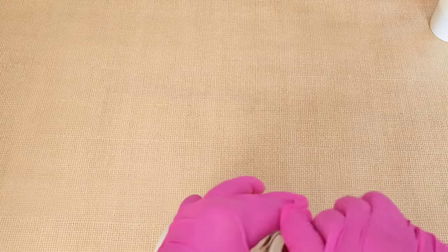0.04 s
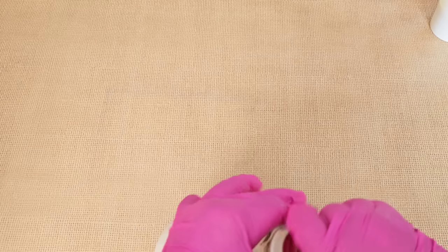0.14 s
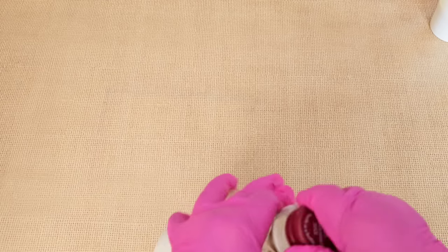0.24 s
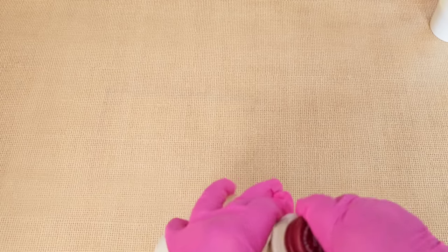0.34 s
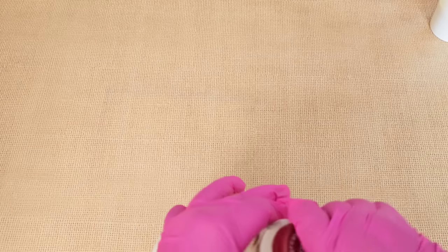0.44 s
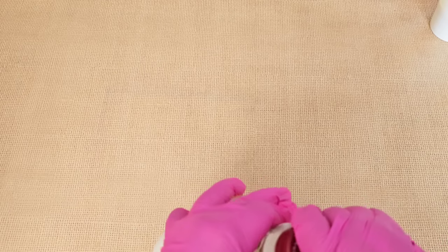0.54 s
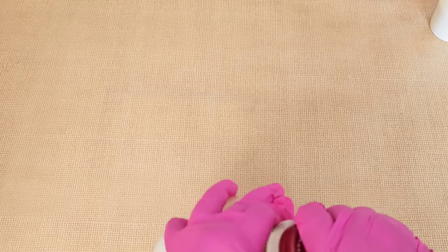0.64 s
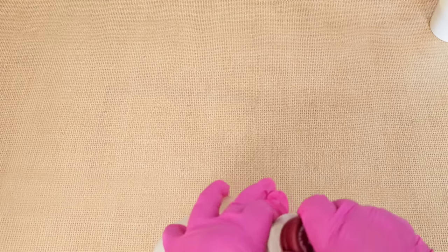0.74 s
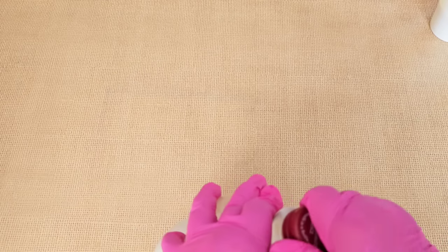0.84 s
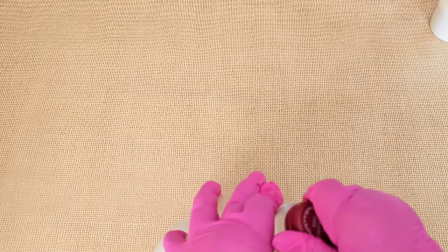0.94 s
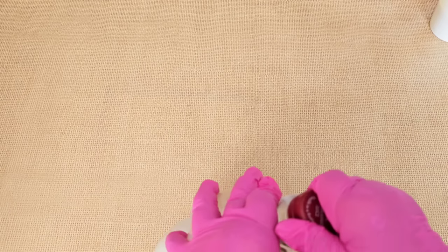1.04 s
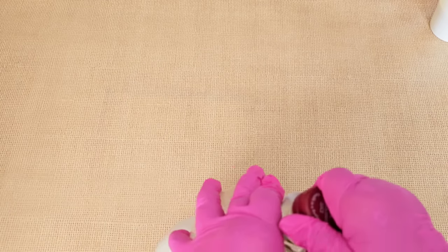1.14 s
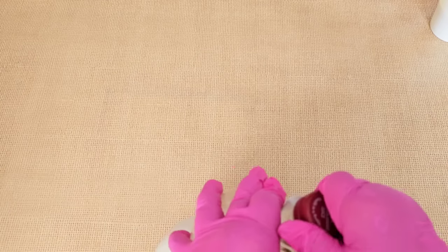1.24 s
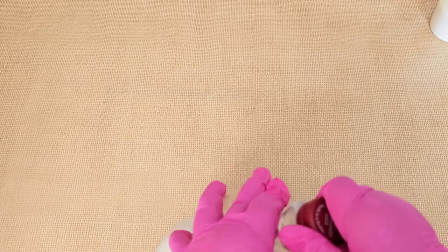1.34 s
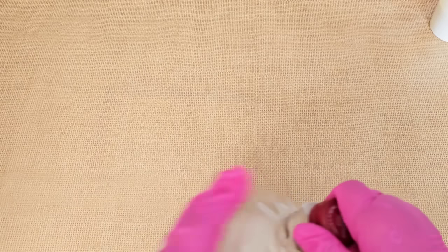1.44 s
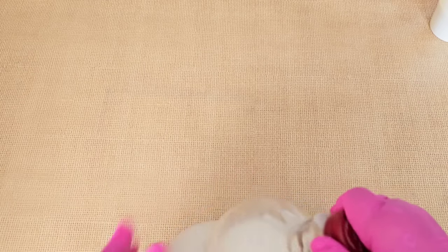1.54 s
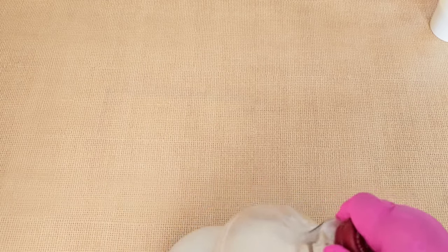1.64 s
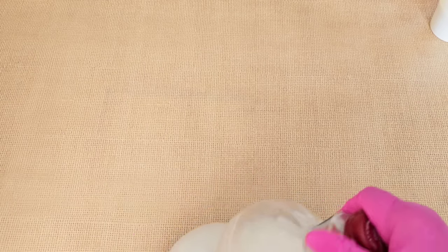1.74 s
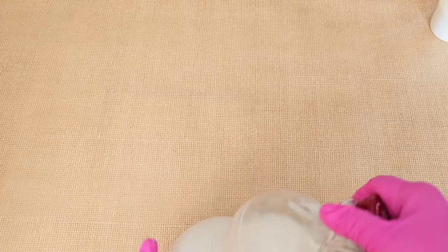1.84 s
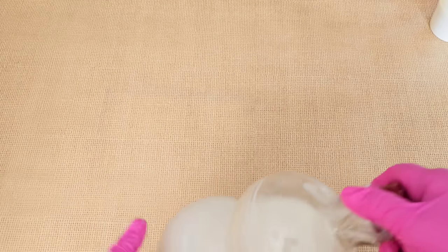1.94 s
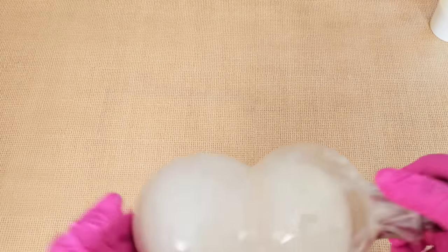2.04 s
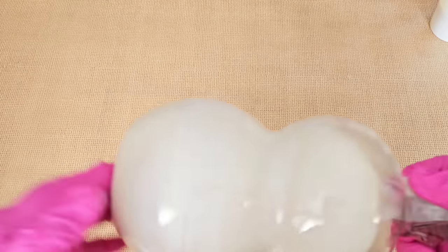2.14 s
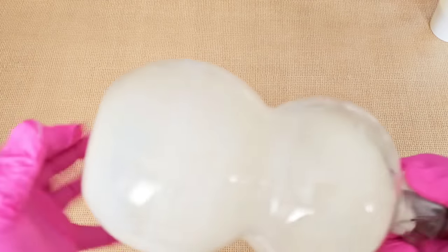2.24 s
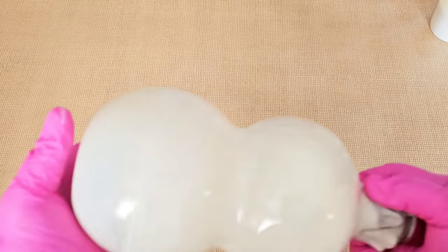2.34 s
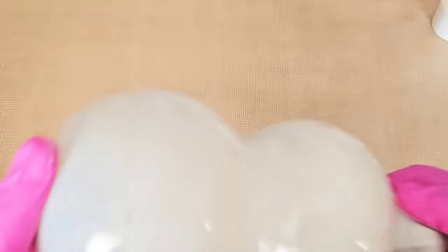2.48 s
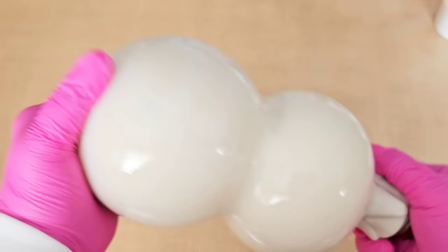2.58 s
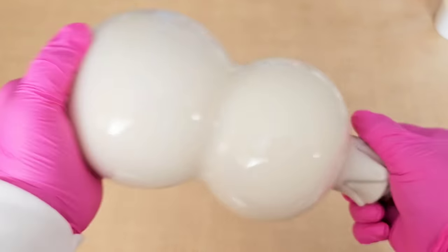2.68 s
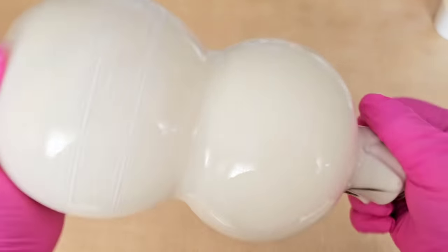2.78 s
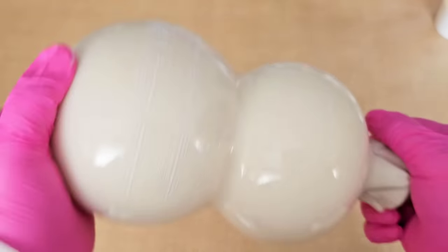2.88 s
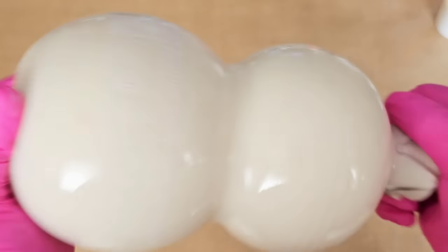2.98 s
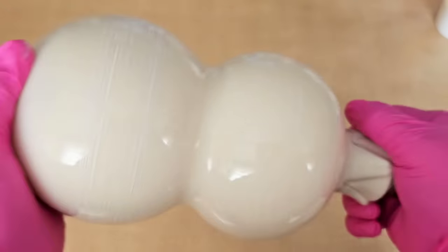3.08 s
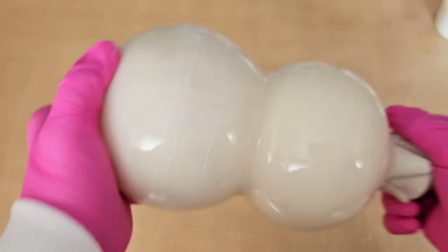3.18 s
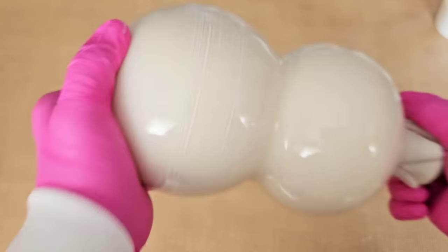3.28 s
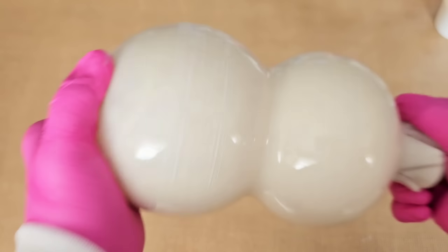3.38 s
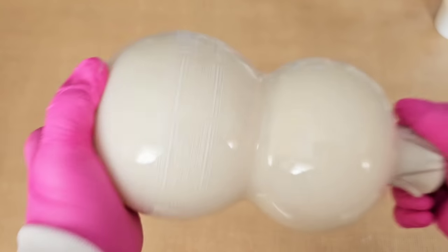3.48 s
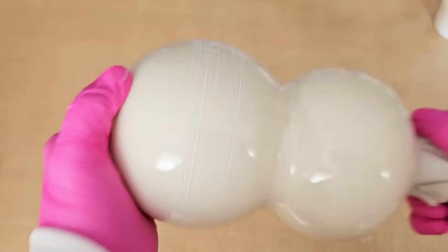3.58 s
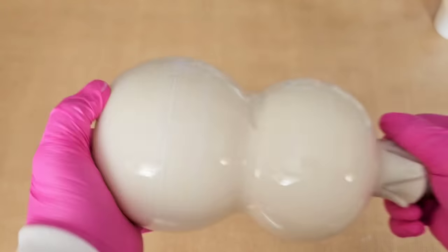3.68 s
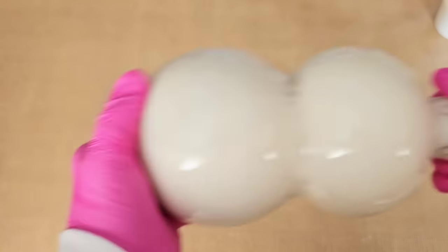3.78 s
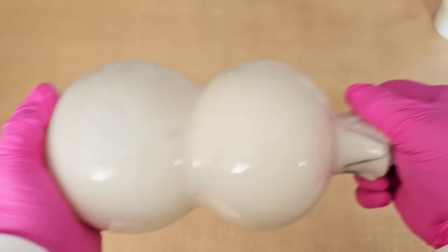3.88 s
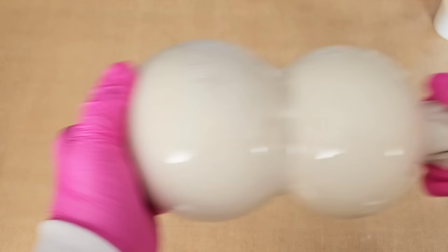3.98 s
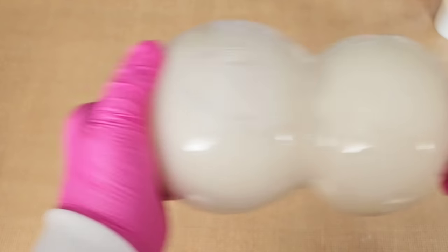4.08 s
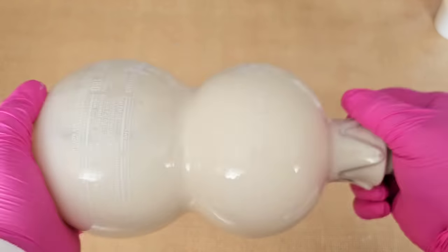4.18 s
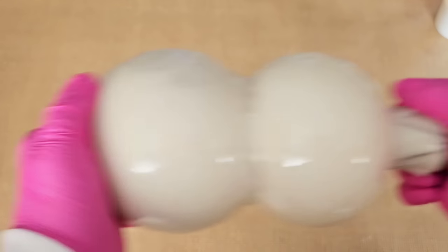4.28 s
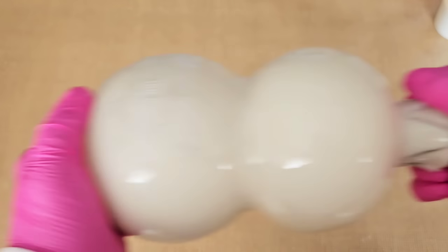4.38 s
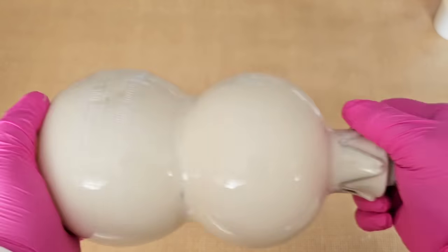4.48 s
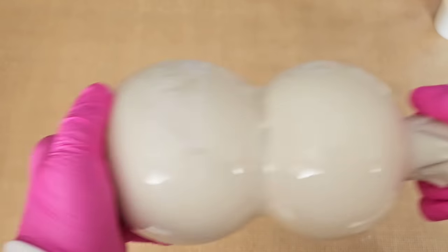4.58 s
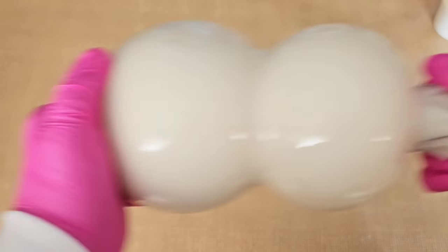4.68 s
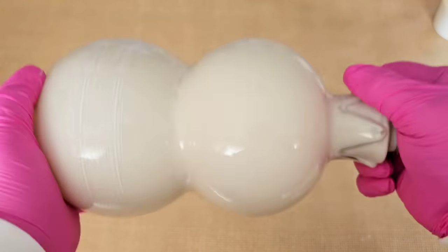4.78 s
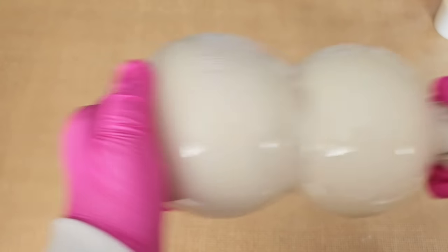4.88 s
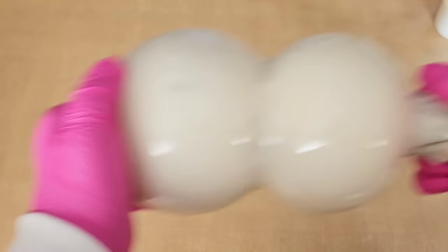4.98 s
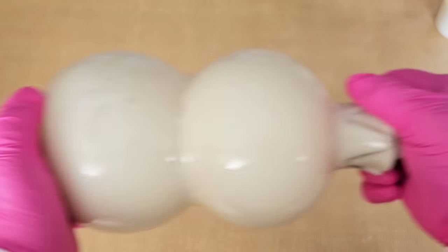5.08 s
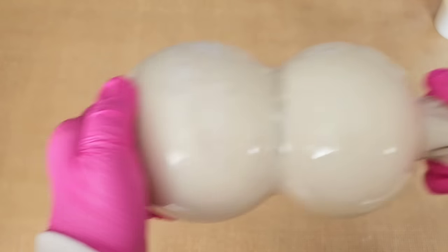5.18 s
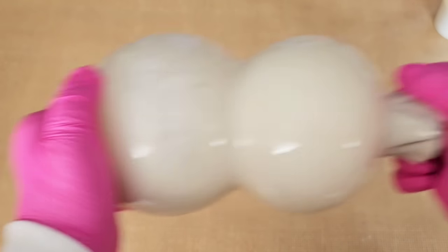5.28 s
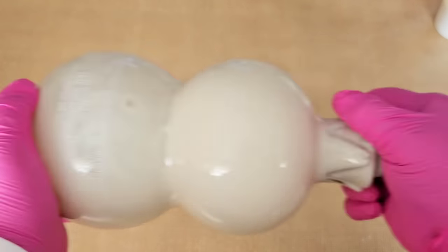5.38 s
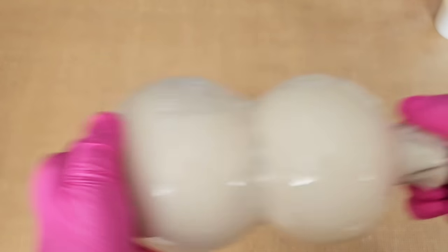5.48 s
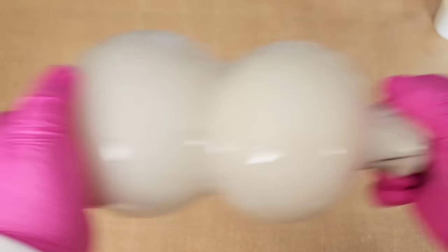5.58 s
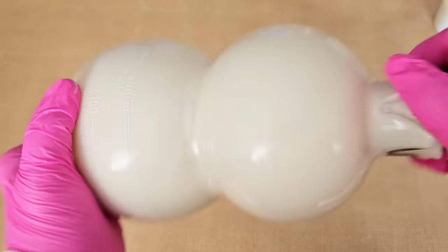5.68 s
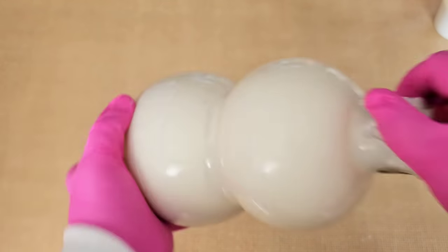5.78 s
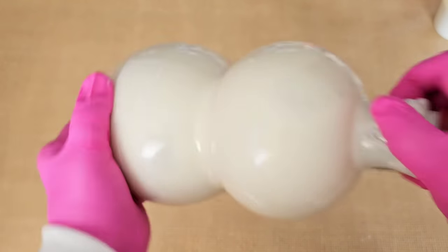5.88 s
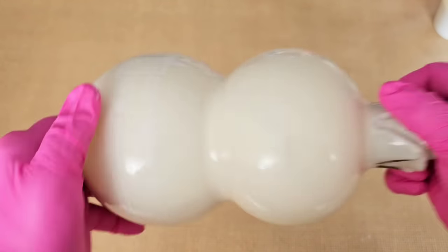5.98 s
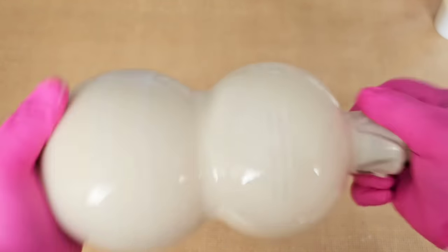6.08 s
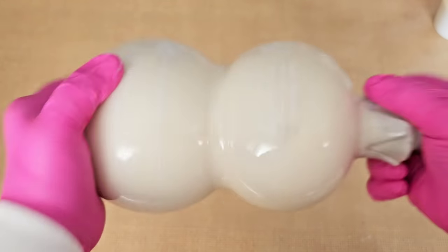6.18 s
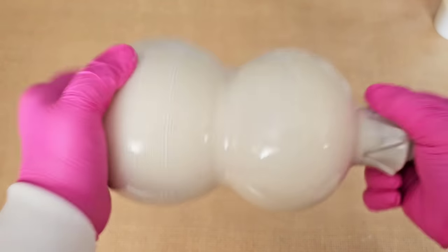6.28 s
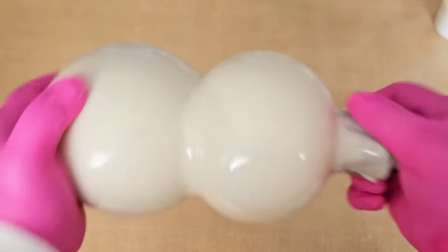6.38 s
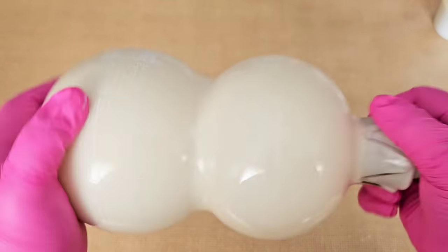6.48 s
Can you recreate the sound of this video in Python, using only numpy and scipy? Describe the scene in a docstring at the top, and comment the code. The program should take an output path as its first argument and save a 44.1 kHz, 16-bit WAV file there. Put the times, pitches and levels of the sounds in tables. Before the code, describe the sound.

After faint rubbery rustling and a short creaky twist, thick liquid glugs, splatters and plinks inside a hand-shaken plastic bottle.

```python
"""Gloved hands take up a two-lobed plastic bottle of thick liquid and shake it close by in a small room.
Over a low rumble and an early drone, glove friction rustles as crackling noise; the twisting grip creaks by
stick-slip, ringing modes of the neck; gloves snap as noise bursts, and the bottle squeaks through a glove.
In the shaking, froth ticks all through, strongest around each splash; trapped air gulps as sliding tones, liquid
slaps the wall as clicks and bubble clusters, clear bubbles plink, strings gurgle, and the bottle rings with it all."""
import sys
import numpy as np
from scipy import signal
from scipy.fft import rfft, irfft
from scipy.io import wavfile
from scipy.ndimage import uniform_filter1d

SR = 44100
rng = np.random.default_rng(int(sys.argv[2]) if len(sys.argv) > 2 else 0)


def unload_audio(sound):
    """Save the sound as a 16-bit wav file, at the path given as the first command line argument."""
    columns = np.transpose(np.atleast_2d(sound))
    # keep every value between -1 and 1, then stretch to whole-number steps
    steps = np.round(np.clip(columns, -1, 1) * 32767)
    wavfile.write(sys.argv[1], SR, steps.astype(np.int16))


N = 287973
TIME = np.arange(N) / SR


def undb(db):
    """Logarithmic level: decibels to amplitude gain."""
    return 10 ** (np.asarray(db) / 20)


def unit(x):
    """Normalization: scale to rms 1."""
    return x / np.sqrt(np.mean(x ** 2) + 1e-20)


def curve(rows, column=1):
    """Linear interpolation: one column of a table, joined by straight lines in time."""
    rows = np.array(rows)
    return np.interp(TIME, rows[:, 0], rows[:, column])


def colour(x, points):
    """Spectral shaping: weight a sound by (Hz, dB) points and scale it to rms 1."""
    hz, db = np.transpose(points)
    f = np.fft.rfftfreq(x.shape[-1], 1 / SR) + 1
    gain = undb(np.interp(np.log(f), np.log(hz), db))
    return unit(irfft(rfft(x) * gain, x.shape[-1]))


def add(out, x, start):
    """Superposition: mix a sound in from a start time in seconds."""
    i = max(int(start * SR), 0)
    part = out[..., i:i + x.shape[-1]]
    part += x[..., :part.shape[-1]]


def ports(x, lag_ms, pan_db=2.3):
    """Interaural cues: a point source reaches the left port a little sooner and louder than the right."""
    late = np.roll(x, int(abs(lag_ms) * SR / 1000))
    return np.array([x * undb(pan_db / 2), late * undb(-pan_db / 2)])


def swell(rise_ms, fall_ms, shape, size=8192):
    """Exponential envelope: times around a peak, and a gain that is 1 / e at the rise and fall times."""
    t = (np.arange(size) - size // 3) / SR
    width = np.where(t < 0, rise_ms, fall_ms) / 1000
    return t, np.exp(-np.abs(t / width) ** shape)


FASTEST_RISE_MS = 0.58


def onset(length_ms, soft_ms):
    """Attack scaling: rise and fall times in ms; the longer the event, the larger the share spent rising.
    At a length of soft_ms the rise is a quarter of it, plus the fastest rise."""
    share = length_ms ** 2 / (length_ms ** 2 + soft_ms ** 2) / 2
    rise = length_ms * share
    return FASTEST_RISE_MS + rise, length_ms - rise


def loudest(x, db, span_ms=4):
    """Short-time level: scale a sound so that its loudest moment has this rms level."""
    k = int(span_ms * SR / 1000)
    power = np.mean(np.atleast_2d(x) ** 2, axis=0)
    smooth = uniform_filter1d(uniform_filter1d(power, k), k)
    return x * undb(db) / np.sqrt(smooth.max() + 1e-20)


def band(x, hz, octaves, skirt):
    """Broad resonance: a hump of power around a pitch, with skirts that fall by a power law."""
    f = np.fft.rfftfreq(x.shape[-1], 1 / SR) + 1
    away = np.log2(f / hz) / octaves
    hump = (1 + away ** 2 / skirt) ** (-(skirt + 1) / 4)
    tilt = np.sqrt(hz / (f + hz / 4))
    return irfft(rfft(x) * hump * tilt, x.shape[-1])


def crackle(scatter_db, size):
    """Impulsive noise: dense clicks, mostly small, a few large."""
    return rng.standard_normal(size) * undb(scatter_db * np.minimum(rng.exponential(size=size), 5))


def bubble(hz, cycles, glide, size=2048):
    """Damped bubble oscillation: it swells within a cycle, rings a few more and dies in the thick liquid,
    rising in pitch as it nears the surface."""
    turns = np.arange(size) / SR * hz
    age = turns / cycles
    env = np.tanh(2 * turns) * np.exp(-age) * np.linspace(1, 0, size)
    sliding_hz = hz * (1 + glide * np.minimum(age, 2))
    return env * np.sin(2 * np.pi * np.cumsum(sliding_hz) / SR)


# spectrum of the room noise before scaling: pitch_hz [Hz], relative_level_db [dB]
ROOM = [(20, -21.5), (48, -4.5), (72, -14), (110, -7), (350, -21.5), (900, -36.5), (6700, -47),
        (10500, -45), (16000, -54.5)]
ROOM_DB = -57  # rms level of that noise
# the drone in the room: time_s [s], upper_tone_level_db [dB]
DRONE = [(.1, -67.5), (1.0, -57.5), (1.7, -77)]


def room(side_db=-10, hum_hz=150.4, low_hum_db=-6, low_hum_hz=117, waver=0.005):
    """Diffuse background: a low rumble, most alike at both ports in the lows, under a thin hiss;
    a wavering drone of two tones swells and fades by frequency modulation and a level curve."""
    mid, side = rng.standard_normal((2, N))
    lowpass = signal.butter(1, 1500, fs=SR, output="sos")
    side = side - (1 - undb(side_db)) * signal.sosfilt(lowpass, side)
    noise = colour(np.array([mid + side, mid - side]), ROOM) * undb(ROOM_DB)

    def hum(hz):
        """Frequency modulation: a tone whose pitch wavers at random a few times a second."""
        wander = unit(band(rng.standard_normal(N), 3.7, 0.8, 13))
        return unit(np.sin(2 * np.pi * np.cumsum(hz * (1 + waver * wander)) / SR))

    drone = (hum(hum_hz) + undb(low_hum_db) * hum(low_hum_hz)) * undb(curve(DRONE))
    return noise + drone


# gloves sliding over plastic: start_s [s], length_s [s], level_db [dB, before the catches vary it]
RUBS = [(.01, 0.042, -62.5), (0.142, 0.125, -68.5), (1.356, 0.1, -58.5), (1.445, 0.25, -69),
        (1.659, 0.19, -56), (1.799, 0.021, -56.5), (1.984, 0.26, -66.5), (2.148, 0.16, -65.5),
        (2.341, 0.0098, -43), (2.48, 0.21, -60), (5.55, 1, -69)]
RUB_ATTACK_SHARE, RUB_RELEASE_S = 0.28, 0.024  # a slide gathers speed over a share of its length
GRIP_DB = -19.5  # rustle of the holding hands, relative to the moving liquid


def rubbing():
    """Sliding friction: each slide sets in, holds and dies away; the holding hands shift with the shaking."""
    slides = np.zeros(N)
    for start, length, db in RUBS:
        attack = np.clip((TIME - start) / (RUB_ATTACK_SHARE * length), 0, 1)
        release = np.exp(-np.maximum(TIME - start - length, 0) / RUB_RELEASE_S)
        slides += undb(db) * attack * release
    grip = undb(curve(SLOSH) + GRIP_DB) * stirring() * (TIME > SLOSH[0][0])
    return slides + grip


def scuff(s, db, hz, octaves, rise_ms, fall_ms, skirt):
    """Band-limited contact noise: one touch of the hands and plastic swells around a pitch."""
    out = np.zeros((2, N))
    t, env = swell(rise_ms, fall_ms, 1, size=32768)
    noise = band(env * rng.standard_normal(len(t)), hz, octaves, skirt)
    add(out, ports(loudest(noise, db), 0.21), s + t[0])
    return out


# spectrum of the rustle before scaling: pitch_hz [Hz], relative_level_db [dB per Hz]
RUB_COLOUR = [(300, -2), (550, 4), (1000, -7), (2000, -1), (3600, 1.5), (8000, -3.5), (16000, -7)]
# gloves snapping on the plastic: loudest_s [s], level_db [dB, before snap_db], centre_hz [Hz], length_ms [ms]
SNAPS = [(1.389, -40.5, 6100, 1.7), (1.85, -47, 8250, 0.5), (2.318, -52, 7100, 1.4),
         (2.3387, -35, 6400, 1.2), (2.3396, -33, 1830, 3.1), (3.024, -43, 10200, 0.63),
         (3.09, -53, 6400, 2.9), (3.831, -44.5, 7600, 2.5), (4.983, -42, 7600, 1)]
SNAP_OCTAVES, SNAP_SOFT_MS = 0.53, 1.4


def gloves(snap_db=2, catch_db=3.5, grain_db=1.5):
    """Dry friction: rubber crackles over plastic in tiny catches, and snaps as the hands take hold."""
    catches = catch_db * unit(band(rng.standard_normal(N), 51, 1.0, 18))
    out = colour(crackle(grain_db, (2, N)), RUB_COLOUR) * rubbing() * undb(catches)
    for s, db, hz, length in SNAPS:
        rise, fall = onset(length, SNAP_SOFT_MS)
        out += scuff(s, db + snap_db, hz, SNAP_OCTAVES, rise, fall, skirt=0.79)
    return out


# twists of the grip on the bottle neck: start_s [s], length_s [s], level_db [dB, mean before creak's gain_db]
TWISTS = [(.754, 0.019, -44.5), (0.806, 0, -49), (.829, 0, -47), (0.8613, 0, -41.5), (0.8826, .018, -39),
          (0.9207, 0.018, -37.5), (0.979, 0.068, -41.5), (1.127, 0, -52)]
SLIP_EVERY_S, SLIP_JITTER_S = 0.0096, .0005


def slips():
    """Stick-slip timing: while a twist lasts, the grip lets go at nearly even intervals: (s, level dB)."""
    events = []
    for start, length, db in TWISTS:
        for k in range(int(length / SLIP_EVERY_S) + 1):
            when = start + k * SLIP_EVERY_S + SLIP_JITTER_S * rng.standard_normal()
            events.append((when, db + 1.4 * rng.standard_normal()))
    return events


# what a slip rings, before scatter: pitch_hz [Hz], t60_s [s], relative_level_db [dB]
NECK_MODES = [(570, 0.0076, 11.5), (810, 0.01, 11), (1340, 0.0093, 3), (1960, 0.0072, 17),
              (5930, 0.0025, 18.5)]


def creak(gain_db=1, size=2048):
    """Stick-slip excitation of modes: every slip of the grip is a click that rings the neck."""
    out, t = np.zeros((2, N)), np.arange(size) / SR
    for s, db in slips():
        ring = np.zeros(size)
        for hz, t60, mode_db in NECK_MODES:
            gain = undb(mode_db + 2 * rng.standard_normal())
            detuned_hz = hz * (1 + 0.069 * rng.standard_normal())
            decay = np.exp(-np.log(1000) * t / t60)
            ring += gain * decay * np.sin(2 * np.pi * (detuned_hz * t + rng.random()))
        scrape = unit(band(rng.standard_normal(size), 4900, 0.35, 4.4)) * np.exp(-t / 0.0069)
        click = (ring + scrape) * np.tanh(t / 0.000071)
        add(out, ports(loudest(click, db + gain_db, 0.32), 0.088), s)
    return out


def lift():
    """Friction and impact: the bottle squeaks and scrapes through the glove, then thuds into the palm."""
    squeak = scuff(2.04, db=-54.5, hz=2057, octaves=0.025, rise_ms=130, fall_ms=84, skirt=0.71)
    scrape = scuff(2.08, db=-57.5, hz=400, octaves=0.3, rise_ms=220, fall_ms=130, skirt=1.5)
    thud = scuff(2.606, db=-33, hz=123, octaves=1.0, rise_ms=3.9, fall_ms=13.0, skirt=0.53)
    return squeak + scrape + thud


STIR_BEFORE_MS, STIR_AFTER_MS = 4, 12.8  # the liquid rushes up to each splash and settles after it
CALM_DB = -3  # gain away from the splashes


def stirring():
    """Agitation and settling: gain of the churning, highest around every splash, calmer between them."""
    stir = np.zeros(N)
    t, env = swell(STIR_BEFORE_MS, STIR_AFTER_MS, 1.0, size=16384)
    for s, *_ in SPLASHES:
        add(stir, env, s + t[0])
    return undb(CALM_DB) + np.minimum(stir, 1)


def swarm(hz, octaves, cycles, glide, scatter_db, lag_ms, count):
    """Random superposition: bubbles of random size scattered through time; rms 1."""
    out = np.zeros((2, N))
    for when, pitch, size, place in zip(rng.random(count), *rng.standard_normal((3, count))):
        ring = bubble(min(hz * 2 ** (octaves * pitch), SR / 4), cycles, glide)
        add(out, ports(ring * undb(scatter_db * min(size, 2)), lag_ms * (1 + place)), when * N / SR)
    return unit(out)


# liquid churning throughout the shaking: time_s [s], level_db [dB, before stirring and each layer's gain]
SLOSH = [(2.35, -62.5), (2.8, -47.5), (3.45, -55), (4.3, -56), (4.65, -59.5), (5.1, -53), (6.53, -59)]


def slosh(churn_db=-2.0, froth_db=-0.5, wet_db=-5.0, surge_db=6.0, surge_hz=14):
    """Bubble statistics: all through the shaking, strongest around each splash, liquid churns with soft
    low bubbles and froth spatters in surges of crisp ticks."""
    motion = undb(curve(SLOSH)) * stirring() * (TIME > SLOSH[0][0])
    wander = unit(band(rng.standard_normal(N), surge_hz, 0.75, 23.0))
    surge = unit(undb(surge_db * np.clip(wander, -2, 2)))
    churn = swarm(320, .55, 4.5, .05, 3.5, .1, count=450)
    froth = swarm(1800, .8, 8, .06, 5.5, .25, count=3600)
    clicks = crackle(4.0, N) * (rng.random(N) < .05)
    wet = unit(band(ports(clicks, 0.18) + crackle(1, (2, N)) / 2, 3200, 0.37, 0.68))
    return motion * (churn * undb(churn_db) + surge * (froth * undb(froth_db) + wet * undb(wet_db)))


# large air pockets, the first being the air space ringing as a hand knocks the bottle: loudest_s [s], level_db
# [dB], pitch_hz [Hz, at the loudest], length_ms [ms], # slide_octaves [octaves, limit of the slide either side
# of that pitch]
GULPS = [(2.353, -45.5, 273.6, 37, -0.23), (2.429, -52.5, 416, 38, 1), (2.604, -30, 309.6, 10.6, 0.028),
         (2.643, -39, 546, 20, 0.25), (2.668, -27, 520.6, 2.9, 0), (2.766, -30.5, 289.5, 11.4, -0.2),
         (2.771, -27.5, 520.6, 19.5, 0.33), (2.868, -41, 468, 20, -0.058), (2.878, -36, 297.3, 16, -0.16),
         (2.926, -27, 488, 11.6, -.2), (3.028, -43, 405, 44, 0.2), (3.091, -43, 433.4, 10.4, -0.29),
         (3.143, -34, 512.6, 10.2, 0.3), (3.236, -36, 415, 14.7, .3), (3.326, -33, 379, 5.7, -0.33),
         (3.336, -36.5, 470, 7, 0.59), (3.536, -33.5, 447, 9.6, -0.18), (3.582, -41.5, 419.5, 7.5, 0.13),
         (4.205, -47, 458, 21, 0.037), (4.292, -39.5, 273, 4.3, -0.079), (4.422, -47, 266, 23, 0.23),
         (4.456, -33.5, 279, 12.8, 0.1), (4.462, -36.5, 479.7, 14.2, -0.36), (4.524, -40, 245.4, 7.6, -0.4),
         (4.608, -41.5, 307.4, 7.7, 0), (4.712, -43, 408, 19.5, 0.19), (4.76, -36, 474, 7.9, -0.083),
         (5.034, -37.5, 310, 18.4, -0.3), (5.151, -41, 507.5, 35.2, .35), (5.2, -50, 284.4, 12.5, -0.16),
         (5.27, -38, 264, 11, -0.18), (5.335, -45.5, 368, 14.3, 0.2), (5.502, -39.5, 253, 11, -0.0074),
         (5.572, -34, 342.4, 28, 0.49), (5.689, -36, 258, 9.7, -0.17), (5.77, -31.5, 565, 6.3, 0.34),
         (5.809, -45, 279.6, 22, 0.2), (5.897, -32, 442, 19.4, -0.24), (6.148, -46, 606, 20.5, 0.15),
         (6.2, -47, 610, 15.4, 0), (6.297, -28.5, 552.5, 5.4, 0.15), (6.331, -47.5, 439, 20, -0.1)]
GULP_SOFT_MS = 10.8


def gulps(shape=5.1, foam_db=-17, foam_hz=1700):
    """Volume oscillation of air: large pockets swell and collapse, their pitch sliding as the thick liquid
    squeezes them, and foam crackles around them."""
    out = np.zeros((2, N))
    for s, db, pitch, length, slide in GULPS:
        t, env = swell(*onset(length, GULP_SOFT_MS), shape)
        waver = .035 * unit(band(rng.standard_normal(len(t)), 110, .6, 8))
        hz = pitch * 2 ** (slide * np.tanh(t / (length / 1000)))
        tone = np.sin(2 * np.pi * (np.cumsum(hz * (1 + waver)) / SR + rng.random()))
        gurgle = .21 * unit(band(rng.standard_normal((2, len(t))), pitch, .7, 6))
        foam = undb(foam_db) * unit(band(rng.standard_normal((2, len(t))), foam_hz, 0.91, 51))
        add(out, loudest(env * (ports(tone, .07) + gurgle + foam), db, 1.0), s + t[0])
    return out


def droplets(drive, hz, cycles, count=4):
    """Convolution with resonators: clicks of spray ring a few small air cavities, each at its own place."""
    steps = np.linspace(-1, 1, count) + rng.uniform(-0.99, 1, count) / count
    pitches = np.minimum(hz * 2 ** (SPLASH_OCTAVES * steps), SR / 4)
    cavities = np.zeros((2, 2048))
    for pitch in pitches:
        cavities += ports(unit(bubble(pitch, cycles, .02)), .12 + .15 * rng.standard_normal())
    return signal.fftconvolve(drive[None], cavities, axes=1)[:, :len(drive)]


# liquid hitting the wall: loudest_s [s], level_db [dB, before splashes' layer gains],
# middle_bubble_pitch_hz [Hz], length_ms [ms]
SPLASHES = [(2.477, -48, 3630, 4.2), (2.574, -47.5, 2030, 33), (2.604, -32.5, 2195, 17),
            (2.625, -44.5, 3500, 7.2), (2.641, -44, 1480, 36), (2.668, -29, 930, 13),
            (2.761, -31, 1404, 3.4), (2.774, -38, 1690, 7.2), (2.808, -40.5, 1350, 14),
            (2.828, -33, 1954, 6.4), (2.878, -33.5, 1890, 11.3), (2.925, -33, 1830, 10.8),
            (3.026, -29.5, 1544, 5), (3.129, -33.5, 1140, 12), (3.176, -40.5, 1656, 10.8),
            (3.292, -46, 1470, 4.3), (3.322, -40, 2620, 6.1), (3.391, -48.5, 3660, 3),
            (3.52, -44, 1810, 11.7), (3.5305, -33.5, 1860, 3.03), (3.5798, -38.5, 1900, 4.6),
            (3.632, -43.5, 4880, 1.66), (3.672, -38, 1690, 6.7), (3.694, -36.5, 2365, 4.2),
            (3.806, -51.5, 1180, 29), (3.829, -41.5, 2270, 4.1), (3.904, -56.5, 2690, 22),
            (4.103, -48.5, 4600, 14), (4.148, -50.5, 2240, 7.4), (4.265, -41, 2960, 3.1),
            (4.3, -46, 2280, 5.2), (4.343, -46.5, 1143, 8.4), (4.468, -45, 2900, 5.5),
            (4.539, -48, 2950, 4.5), (4.579, -66, 2610, 2.1), (4.711, -50, 1630, 10.5),
            (4.79, -51, 2500, 15), (4.827, -66, 1500, 28), (4.98, -30.5, 2230, 2.04),
            (4.988, -38, 2460, 32), (5.031, -45, 1760, 26), (5.147, -47.5, 1860, 14),
            (5.262, -34.5, 1370, 5.4), (5.287, -58, 1470, 4.4), (5.431, -46, 2325, 8.1),
            (5.504, -45, 1443, 20), (5.575, -36.5, 1840, 6.5), (5.618, -45, 1485, 15),
            (5.685, -52, 3430, 7.4), (5.734, -40.5, 2170, 3.6), (5.757, -45, 3680, 5.9),
            (5.856, -33, 1990, 10), (5.895, -37.5, 1235, 13.3), (6.208, -51, 1930, 22),
            (6.252, -47, 2710, 41), (6.2914, -34, 1583, 1.6), (6.334, -41, 1404, 11),
            (6.405, -52, 2110, 3.3)]
SPLASH_OCTAVES, SPLASH_SOFT_MS = 0.621, 16  # scale of the spread of bubble pitches; soft length


def splashes(cycles=7, glide=0.028, gain_db=1.5, shape=1.0, wash_db=-23, wash_ms=20, wash_hz=2900,
             mist_db=-20, mist_hz=5400, count=13):
    """Impact and air entrainment: each slap is a wet crackle with a cluster of small bubbles born in it;
    the film drains off the wall as a wash of noise and fine droplets sparkle."""
    out = np.zeros((2, N))
    for s, db, hz, length in SPLASHES:
        t, env = swell(*onset(length, SPLASH_SOFT_MS), shape)
        lag = 0.15 + 0.11 * rng.standard_normal()
        drops = crackle(4.05, len(t)) * (rng.random(len(t)) < .1)
        spray = ports(band(env * drops, hz, SPLASH_OCTAVES, 3.0), lag)
        cavities = droplets(env * drops, hz, cycles)
        births = rng.choice(t - t[0], count, p=env ** 2 / np.sum(env ** 2))
        births[count // 2::4] = -t[0]  # the main bubble and a small one pinch off at the height of the slap
        bubbles = np.zeros_like(spray)
        # sizes cover the whole spread; middle ones are loudest, and low ones louder than high ones
        for size, born in zip(np.linspace(-1, 1, count), births):
            detune, place = rng.standard_normal(2)
            pitch = min(hz * 2 ** (SPLASH_OCTAVES * (1.195 * size + 0.22 * detune)), SR / 4)
            strength = np.sqrt(np.interp(born, t - t[0], env)) * undb(-7 * size ** 2 - size)
            ring = bubble(pitch, cycles, glide) * strength
            add(bubbles, ports(ring, lag + 0.11 * place), born - .0004)
        burst = loudest(bubbles, 0) + loudest(cavities, -3) + loudest(spray, -5)
        wash_env = swell(14.0, wash_ms, 0.6)[1]
        wash = band(wash_env * np.array([drops, drops[::-1]]), wash_hz, 0.29, 32.0)
        sparse = drops * (rng.random(len(t)) < .15)
        mist = droplets(swell(2, wash_ms / 2, 1)[1] * sparse, mist_hz, 14)
        splash = loudest(burst, db + gain_db) + loudest(wash, db + wash_db) + loudest(mist, db + mist_db)
        add(out, splash, s + t[0])
    return out


def thumps(thump_db=-19, thump_hz=225, octaves=0.36, rise_ms=3, fall_ms=12, fine_db=4):
    """Momentum transfer: the weight of every splash pushes the wall out with a dull thump,
    weaker by the octave for finer spray."""
    out = np.zeros((2, N))
    for s, splash_db, hz, _ in SPLASHES:
        db = splash_db - fine_db * np.log2(hz / 1500)
        t, env = swell(rise_ms, fall_ms, 1)
        thump = band(env * rng.standard_normal(len(t)), thump_hz, octaves, 6.8)
        add(out, ports(loudest(thump, db + thump_db), .07), s + t[0])
    return out


# clear-ringing bubbles, alone or several at once, many within a splash:
# start_s [s], level_db [dB, of the ring], pitch_hz [Hz, at first]
PLINKS = [(2.625, -31, 6500), (2.664, -45, 7800), (2.762, -34.5, 2300), (2.761, -33.5, 4240),
          (2.775, -36.5, 1760), (2.922, -34, 2360), (2.922, -33.5, 1450), (3.321, -34, 2800),
          (3.324, -32, 3760), (3.409, -39, 1435), (3.531, -28.5, 2050), (3.532, -31.5, 3190),
          (3.533, -31.5, 733), (3.634, -44, 5460), (3.703, -46, 1375), (3.753, -45.5, 1460),
          (4.316, -43.5, 2370), (4.91, -36.5, 2960), (4.934, -37, 2980), (4.988, -33.5, 1680),
          (5.104, -39.5, 2750), (4.429, -52, 2100), (5.263, -44.5, 960), (5.428, -41.5, 2780),
          (6.294, -35, 1060)]


def plinks(cycles=8, glide=0.016, pop_db=-5, pop_ms=3):
    """Free bubble resonance: a bubble pinches off with a tiny pop and rings."""
    out = np.zeros((2, N))
    for s, db, hz in PLINKS:
        ring = bubble(hz, cycles, glide)
        decay = np.exp(-np.arange(len(ring)) / SR * 1000 / pop_ms)
        pop = band(rng.standard_normal(len(ring)) * decay, hz, 0.36, 3.0)
        add(out, ports(loudest(ring, db) + loudest(pop, db + pop_db), .07), s)
    return out


# air forced through the liquid in a string of like bubbles: loudest_s [s], level_db [dB],
# mean_pitch_hz [Hz, before the glide], half_length_ms [ms]
GURGLES = [(2.883, -36, 1990, 18), (3.132, -39, 3970, 15.3), (3.979, -48, 1624, 41),
           (4.105, -49.5, 1413, 14), (4.105, -54, 5670, 12), (4.784, -46.5, 1107, 25),
           (5.15, -45, 2190, 16), (5.592, -35.5, 1556, 12), (6.312, -42.5, 1350, 21),
           (6.337, -47.5, 3860, 12.6)]


def gurgles(cycles=10, glide=0.035, spread_octaves=0.171, tick_db=-9, count=12):
    """Serial bubble formation: bubbles of nearly one size pinch off in quick succession, each with a tick."""
    out = np.zeros((2, N))
    for s, db, hz, half_length in GURGLES:
        string, span = np.zeros((2, 8192)), half_length / 1000
        for turn in np.linspace(-1, 1, count):
            late, detune, place = rng.standard_normal(3)
            ring = bubble(hz * 2 ** (spread_octaves * detune), cycles, glide)
            decay = np.exp(-np.arange(len(ring)) * hz / SR)
            tick = undb(tick_db) * rng.standard_normal(len(ring)) * decay
            pinch = (ring + tick) * np.exp(-2 * turn ** 2)  # strongest in the middle of the string
            add(string, ports(pinch, .12 + .12 * place), span * (1 + turn + 2 * late / count))
        add(out, loudest(string, db), s - span)
    return out


# resonances of the bottle and its air space: pitch_hz [Hz], width_hz [Hz], relative_level_db [dB]
BOTTLE = [(252.3, 83, 10), (464, 91, 8), (720, 72, -5), (1580, 41, -12)]


def bottle(x, ring_db=-8):
    """Shell and cavity resonance: the contents are heard through the shell, which rings on briefly."""
    rings = np.zeros_like(x)
    for hz, width, db in BOTTLE:
        b, a = signal.iirpeak(hz, hz / width, SR)
        rings += undb(db) * signal.lfilter(b, a, x)
    return x + undb(ring_db) * rings


def echoes(x, wet_db, t60=0.068, size=16384):
    """Reverberation: the table and walls return a short, faint tail of exponentially decaying noise."""
    t = np.arange(size) / SR
    decay = np.exp(-np.log(1000) * t / t60)
    tail = rng.standard_normal((2, size)) * decay * np.clip(t / 0.0081, 0, 1)
    response = unit(tail) / np.sqrt(size)
    return undb(wet_db) * signal.fftconvolve(x.mean(axis=0)[None], response, axes=1)[:, :N]


def scene():
    """Superposition of sources: hands first, then the shaken liquid, all in the same small room."""
    hands = gloves() + creak() + lift()
    liquid = bottle(slosh() + gulps() + splashes() + thumps() + plinks() + gurgles())
    return room() + hands + liquid + echoes(hands, wet_db=-6) + echoes(liquid, wet_db=-21.5)


TOP_HZ = 16000


def record(dry):
    """Band limitation: a steep elliptic low-pass cuts the top."""
    return signal.sosfilt(signal.ellip(8, .2, 70, TOP_HZ, fs=SR, output="sos"), dry)


dry = scene()
out = record(dry)
unload_audio(out)
```